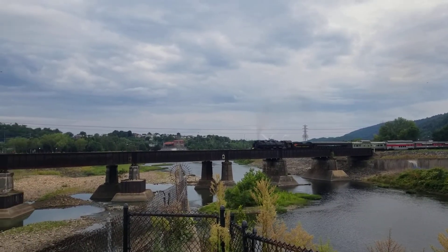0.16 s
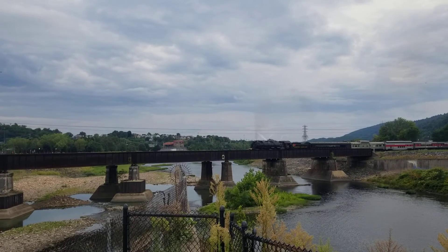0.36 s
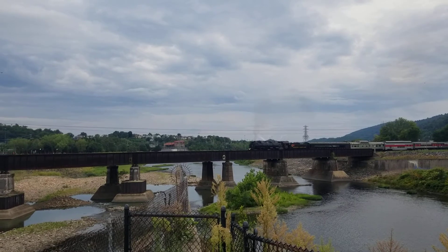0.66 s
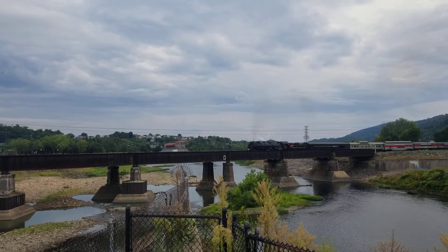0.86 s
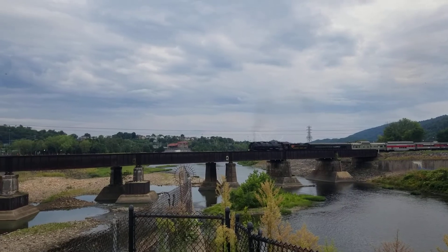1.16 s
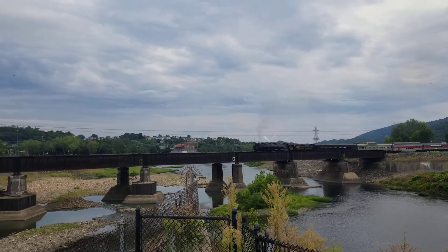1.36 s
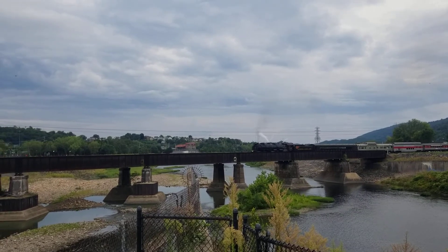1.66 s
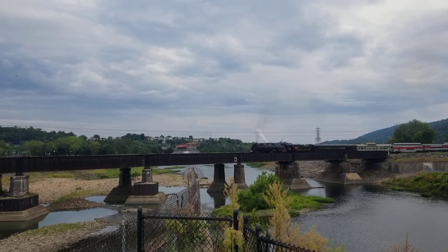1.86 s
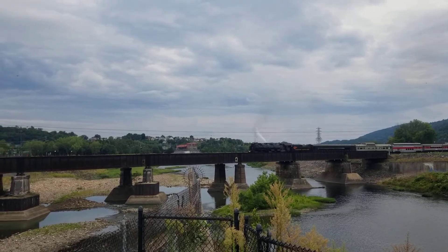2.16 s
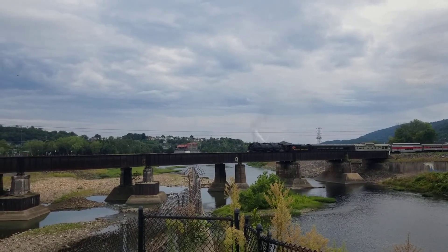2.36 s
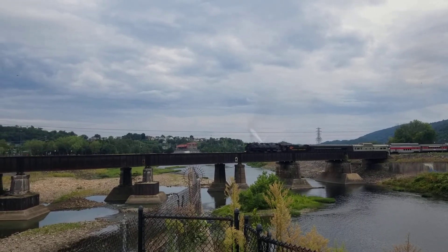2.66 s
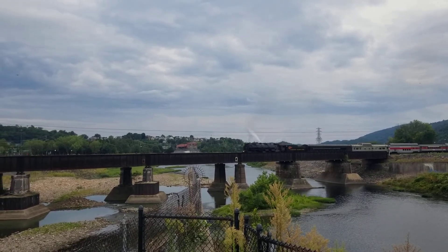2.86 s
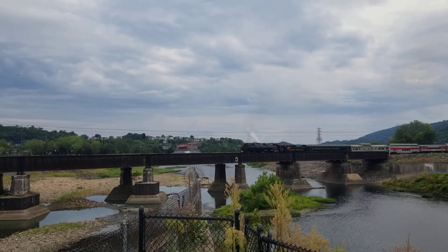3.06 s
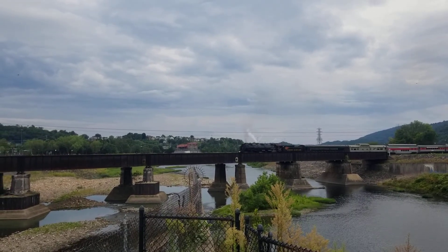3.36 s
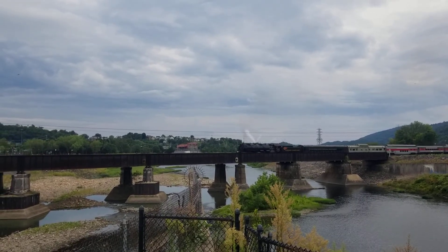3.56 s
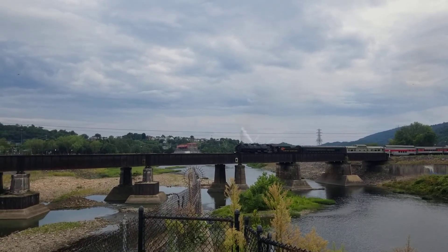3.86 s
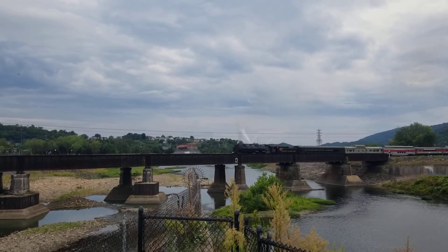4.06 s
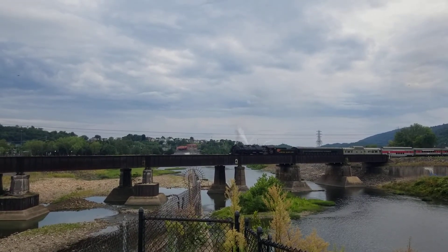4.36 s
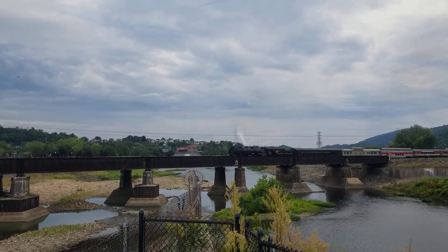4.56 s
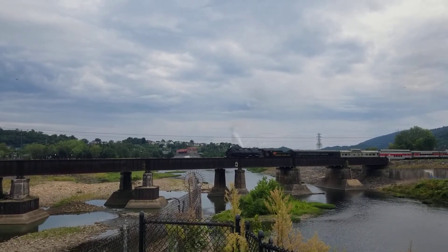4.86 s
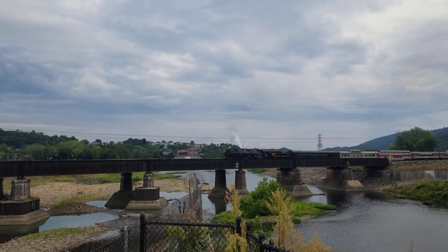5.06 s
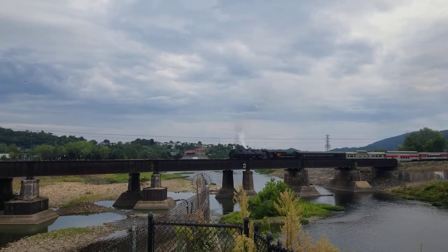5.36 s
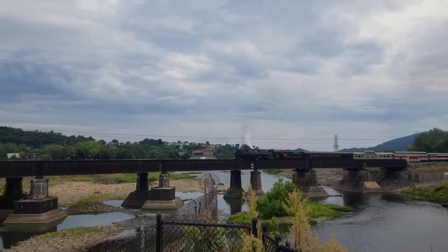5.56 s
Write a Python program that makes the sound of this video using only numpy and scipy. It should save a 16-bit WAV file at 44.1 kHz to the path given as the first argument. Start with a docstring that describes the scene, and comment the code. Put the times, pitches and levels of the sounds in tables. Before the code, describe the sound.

The driver eases the steam whistle from its full mid-low pitch to a duller, lower moan, jerks out a short sharp toot, almost shuts it, then opens fully for over four seconds. The tone is rich, buzzy and breathy with steam, gently shimmering. Bank and pier echoes and long open-air reverberation surround it, with soft train rumble beneath, heard from a distant stereo microphone.

```python
"""Over a river bridge in a valley, a distant locomotive creeps away blowing a single-chime steam whistle.
The valve eases off, jerks open, shuts, then opens fully; steam pressure sets pitch and overtones alike.
The whistle is a harmonic series with pulsed hiss. The bank returns a late, slightly flatter echo that beats
with the direct tone, and the far piers a later one. The valley tail is the whistle convolved with sparse
decaying reflections; the train's rumble is coloured noise."""
import sys
import numpy as np
from scipy import signal
from scipy.fft import rfft, irfft, next_fast_len
from scipy.io import wavfile
from scipy.ndimage import uniform_filter1d

SR = 44100
rng = np.random.default_rng(int(sys.argv[2]) if len(sys.argv) > 2 else 0)


def unload_audio(sound):
    """Save the sound as a 16-bit wav file, at the path given as the first command line argument."""
    columns = np.transpose(np.atleast_2d(sound))
    # keep every value between -1 and 1, then stretch to whole-number steps
    steps = np.round(np.clip(columns, -1, 1) * 32767)
    wavfile.write(sys.argv[1], SR, steps.astype(np.int16))


N = 252252
LEAD = 2 * SR  # samples of whistle computed ahead of the start, to feed echoes and tail

# the driver's hand on the valve, as the pitch the steam pressure heads for: (time [s], pitch [Hz])
VALVE_PITCH = [(-2, 350), (-.2, 349), (-.1, 344), (-.02, 336), (.18, 326.2), (.7, 324.7), (.95, 323.1),
               (1.12, 320), (1.19, 319.8), (1.225, 347.2), (1.379, 347.2), (1.408, 310), (1.605, 306.2),
               (1.612, 348), (2.1, 349), (2.8, 349.7), (3.3, 349.3), (3.65, 350.1), (5.35, 350.6),
               (5.72, 348.6)]
PRESSURE_LAG_S = .018
SHUT_HZ, OPEN_HZ = 309, 350  # pitches at which the pressure scale reads 0 and 1

# overtone level falls with the logarithm of the pressure above the share SPEAK
OPEN_DB, DB_PER_DECADE, SPEAK, LEAK = -24.5, 8, .1, 0.0014
# a valve jerked open overblows for a moment; one slammed shut chokes the overtones while the pitch falls
SURGE_DB, CHOKE_DB = 7.5, 11  # per full pressure change within one PRESSURE_LAG_S
TREBLE_SHUT_DB, TREBLE_RISE_DB = -44, 18  # the treble grows evenly with pressure
# slow swelling and dulling of the treble: (time [s], relative level [dB])
TREBLE_SWELL = [(0, 0.1), (1.15, 2.6), (1.3, 2.5), (1.7, -1), (2.05, -0.5), (2.6, 2), (3.2, 1.7), (3.5, 4),
                (4.4, 2.5), (4.92, -2.5), (5.3, 0.8), (5.72, 2)]
TOP_HZ, TOP_SWING, TOP_EVEN_DB = 9800, .8, 1.5  # above TOP_HZ the treble swells and dulls further

# fundamental, swelled and thinned by near reflections as the train rolls: (time [s], level [dB])
FUNDAMENTAL_LEVEL = [(0, -28), (.05, -21.5), (.1, -15.5), (.19, -16.5), (.21, -29), (.24, -14), (.3, -36),
                     (.33, -18.5), (.42, -14), (.55, -29), (.66, -23.5), (.85, -26), (1.04, -14.5),
                     (1.14, -26.5), (1.24, -17.5), (1.36, -21), (1.44, -21), (1.53, -27), (1.6, -21.5),
                     (1.85, -16.5), (2, -29), (2.2, -17), (3.2, -17.5), (3.6, -26.5), (4.05, -19),
                     (4.2, -18.5), (4.45, -15), (4.75, -22), (5.1, -15.5), (5.55, -16.5), (5.72, -31)]
# overtones at low pressure: (multiple [1], relative level [dB])
SOFT_OVERTONES = [(1, 0), (2, -17), (3, -4), (4, -11), (5, -25), (6, -13), (7, -13), (8, -14), (9, -18),
                  (10, -18), (11, -20), (12, -28), (13, -29), (14, -26)]
# overtones at full pressure: (multiple [1], relative level [dB])
FULL_OVERTONES = [(1, 1.5), (2, -11.5), (3, -1.5), (4, -18), (5, -14), (6, -5), (7, -14), (8, -16.5),
                  (9, -14), (10, -19.5), (11, -22.5), (12, -18.5), (13, -21), (14, -20)]
# overtones above those: (frequency [Hz], relative level [dB])
TREBLE_OVERTONES = [(5000, -21), (6000, -29), (7000, -29), (7900, -20.5), (9000, -34.5), (10000, -24),
                    (11500, -22), (12600, -23), (14000, -43), (15500, -45)]
# near reflections sway the low overtones, each at its own pace:
# (multiple [1], depth [dB], period [s], time of the cosine's crest [s], drift [dB/s])
OVERTONE_SWAY = [(2, 2.5, 2.72, 2.35, -2), (3, 1.5, 3.13, 2.04, 0.4), (4, 8.5, 5.1, 5.6, -0.9),
                 (5, 2, 4, 1.85, -1), (6, 0.9, 2.9, 3.1, -0.6), (7, 5.5, 3.66, 5.2, 0.85),
                 (8, 4.7, 3.96, 2.2, 0.2), (9, 2.5, 2.9, 4.23, -1.4), (10, 3.5, 2.6, 4.6, .1),
                 (12, 1.5, 3.6, 4.3, -0.9)]
SWAY_MIDDLE_S = 3.7  # the drift passes zero here
SOFT_FLUTTER = 0.45  # overtones waver more at low pressure, by this share
# each pulse returns off the boiler and the water: (delay [cycles], gain [1])
PULSE_REPEATS = [(0, 1), (.15, .3), (.65, .6)]

# steam hiss between the overtones: (frequency [Hz], relative density [dB per Hz])
HISS_COLOUR = [(60, -37), (200, -16), (420, -15), (800, 0), (1200, 1), (1600, -7.5), (2200, 0.5),
               (3200, 0.5), (3900, -5.5), (5500, -7.5), (8000, -8.5), (9300, -8.5), (11500, -6),
               (13200, -11), (14500, -26), (15600, -37)]
HISS_SAME = [(300, 0.88), (1500, 0.92), (10000, 0.69)]  # (frequency [Hz], left-right likeness [1])

# microphone pair facing the bridge:
# (frequency [Hz], left minus right level [dB], phase left leads beyond its lag [rad])
MICROPHONE_PAIR = [(98, 1, 0.064), (336, 3.5, 0.08), (700, 2.5, -0.078), (990, 1, -0.77),
                   (1380, 1.5, -0.82), (1570, -1, 1.76), (2130, -1, 0.049), (3180, -1.5, -0.14),
                   (4600, 2.5, 0.22), (6160, -2, -0.32), (8450, 1.5, 0.83), (9400, -1.5, -0.23),
                   (14000, 3.5, 0.42)]
LEFT_LAG_S = 3.2e-5

# bank echo, fundamental: (time [s], level before the order and side gains [dB])
BANK_FUNDAMENTAL = [(0, -26), (.3, -53), (.6, -56), (1.7, -44), (1.9, -31), (2.25, -22), (2.9, -28),
                    (3.75, -26.5), (4.25, -33.5), (4.6, -30), (5.1, -43), (5.72, -35)]
# bank echo, harmonics: (multiple [1], level above its fundamental or overtone level [dB], left lead [rad])
BANK_HARMONICS = [(1, 2.5, -0.5), (2, -22, 0.5), (3, -8.5, 4), (4, -23, 3), (5, -27.5, -1.5), (6, -18.5, 2)]
BANK_MS, BANK_MS_PER_S = 177.8, 13.22  # delay at the start and its growth
# pier echo, fundamental: (time [s], level before the order and side gains [dB])
PIER_FUNDAMENTAL = [(0, -29), (.22, -34), (.3, -43), (1.4, -38), (1.46, -21.5), (1.63, -21.5), (1.7, -29),
                    (1.86, -33), (2, -44), (5.72, -57)]
# pier echo, harmonics: (multiple [1], level above its fundamental or overtone level [dB], left lead [rad])
PIER_HARMONICS = [(1, 1, 0.3), (2, -25.5, 0.73), (3, -20, 0.78), (4, -41, 1.5), (5, -19.5, 2.4),
                  (6, -25.5, 0.63)]
PIER_MS, PIER_MS_PER_S = 232, 1.5  # path nearly constant

# what the valley keeps of the whistle: (multiple [1], level relative to the overtone level [dB])
VALLEY_HARMONICS = [(1, -12), (2, -20), (3, -17), (4, -28), (5, -25), (6, -21), (7, -28), (8, -30),
                    (9, -30)]
# reverberation of the valley: (frequency [Hz], time to fall by 60 dB [s])
VALLEY_DECAY = [(200, 11), (500, 2.6), (1500, 3.9), (5000, 1.44)]

# train rumble: (frequency [Hz], relative density [dB per Hz])
RUMBLE_COLOUR = [(15, -48), (27, -18), (45, -1.5), (65, 4), (110, -4.5), (200, -13), (260, 0.5),
                 (400, -1.5), (1000, -9), (3000, -12.5), (8000, -28.5), (12000, -24.5), (15000, -50)]
# train rumble: (frequency [Hz], left-right likeness [1])
RUMBLE_LIKENESS = [(60, 0.99), (150, 0.99), (250, .95), (600, 0.33), (1500, 0.12), (15000, 0)]
EDGE_HZ = 15700  # band limit of the output


def gain_of(db):
    """Logarithmic level: decibels to amplitude gain."""
    return np.exp(np.asarray(db) * (np.log(10) / 20))


def evened(x):
    """Normalization of power: scales to rms 1."""
    return x / np.sqrt(np.mean(x ** 2) + 1e-20)


def curve(rows, t):
    """Linear interpolation in time: the columns of a time table at times t."""
    s, *columns = np.transpose(rows)
    return [np.interp(t, s, c) for c in columns]


def read(points, hz, axis=1):
    """Interpolation on a logarithmic frequency axis: a column of a spectrum table at hz."""
    table = np.transpose(points)
    return np.interp(np.log(hz + 1), np.log(table[0] + 1), table[axis])


def wander(rate_hz, count):
    """Low-pass filtered random process: slow curves of rms 1."""
    steps = uniform_filter1d(rng.standard_normal((count, N // 64 + 2)), 5)
    pole = np.exp(-2 * np.pi * rate_hz * 64 / SR)
    smooth = evened(signal.lfilter([1], [1, -pole], steps))
    return [np.interp(np.arange(N) / 64, np.arange(len(row)), row) for row in smooth]


def noise(colour, likeness, patchy_db):
    """Spectral shaping of partly coherent noise: two channels with drifting patches."""
    frames, hz = N // 256 + 5, np.fft.rfftfreq(1024, 1 / SR)
    a, b, c, d, patches = rng.standard_normal((frames, 513, 5)).T
    patches = evened(uniform_filter1d(uniform_filter1d(patches, 10, 0), 12, 1))
    same = np.clip(read(likeness, hz), 0, 1)[:, None]
    left = a + 1j * b
    right = same * left + np.sqrt(1 - same ** 2) * (c + 1j * d)
    spectra = np.array([left, right]) * gain_of(read(colour, hz)[:, None] + patchy_db * patches)
    return evened(signal.istft(spectra, nperseg=1024, noverlap=768)[1][:, :N])


def highpass(x, hz):
    """Second-order Butterworth filtering: passes what lies above hz."""
    return signal.sosfilt(signal.butter(2, hz, "high", fs=SR, output="sos"), x)


def pitch(t):
    """First-order relaxation: pressure, and pitch with it, follows the valve with a short lag."""
    coarse = np.arange(-LEAD, N + 32, 32) / SR
    keep = np.exp(-32 / (PRESSURE_LAG_S * SR))
    aim = curve(VALVE_PITCH, coarse)[0]
    lagged = aim[0] + signal.lfilter([1 - keep], [1, -keep], aim - aim[0])
    return np.interp(t, coarse, lagged)


def cycles(t):
    """Phase as the integral of frequency: cycles run through by emission time t."""
    fine = np.arange(-LEAD, N) / SR
    return np.interp(t, fine, np.cumsum(pitch(fine)) / SR)


def blow(t):
    """Pressure-driven excitation: overtone level, and treble above it, from the steam pressure."""
    steam = np.clip((pitch(t) - SHUT_HZ) / (OPEN_HZ - SHUT_HZ), 0, 1)
    change = np.gradient(steam, 1 / SR) * PRESSURE_LAG_S
    excess = np.maximum(steam - SPEAK, 0) / (1 - SPEAK)
    level_db = OPEN_DB + DB_PER_DECADE * np.log10(excess + LEAK)
    level_db = level_db + np.where(change > 0, SURGE_DB, CHOKE_DB) * change
    level_db = uniform_filter1d(level_db, size=SR // 50)
    treble_db = TREBLE_SHUT_DB + TREBLE_RISE_DB * steam + curve(TREBLE_SWELL, t)[0]
    return level_db, treble_db - level_db


def overtones(t, shaky, pressure, top_db):
    """Fourier synthesis of a pulse train: harmonics 2 to 44 with levels set by pressure."""
    hz, (level_db, treble_db) = pitch(t), blow(t)
    shut = np.clip((318 - hz) / 6, 0, 1)  # barely blown, the tone keeps only its lowest overtones
    flutter = 1 + SOFT_FLUTTER * (1 - pressure)
    fades = wander(rate_hz=7.0, count=44)  # moving air lets each overtone fade on its own
    drifts = wander(rate_hz=5.3, count=44)  # and arrive from a slightly other side
    sway = {}
    for k, depth_db, period, top, drift in OVERTONE_SWAY:
        swing = depth_db * np.cos(2 * np.pi * (t - top) / period)
        sway[round(k)] = swing + drift * (t - SWAY_MIDDLE_S)
    tone = np.zeros((2, N))
    for k in range(2, 45):
        if k <= len(FULL_OVERTONES):
            soft_db = SOFT_OVERTONES[k - 1][1] + 8 + shut * max(11.0 - 1.9 * k, 0)
            full_db = FULL_OVERTONES[k - 1][1] + 5
            db = (1 - pressure) * soft_db + pressure * full_db + 0.035 * k * (treble_db - 2.5)
        else:
            db = np.repeat(read(TREBLE_OVERTONES, k * hz[::64]), 64)[:N]
            db = db + treble_db + 8.0 + top_db * (k * OPEN_HZ > TOP_HZ)
        depth = np.clip(-(db.mean() - 3.5) / 16, 0, 1) * min(k / 4, 1)  # weak, high ones waver most
        db = level_db + db + pressure * sway.get(k, 0) + 1.92 * flutter * depth * fades[k - 1]
        repeats = np.angle(sum(g * np.exp(-2j * np.pi * k * at) for at, g in PULSE_REPEATS))
        late = repeats + 0.35 * depth * fades[-k]
        side = 0.3 * depth * drifts[k - 1] * np.array([[1], [-1]])
        tone += np.sqrt(2) * gain_of(db) * np.cos(2 * np.pi * k * shaky - .4 + late + side)
    return tone


def steam_hiss(t, shaky, pressure, top_db):
    """Amplitude modulation of turbulence noise: a puff of hiss rides on every pulse and its repeats."""
    level_db, treble_db = blow(t)
    puff = .65 + sum(g * np.exp(-((shaky - at) % 1) / .08) for at, g in PULSE_REPEATS)
    hiss = evened(puff * noise(HISS_COLOUR, HISS_SAME, patchy_db=1.0))
    hiss = hiss + (gain_of(top_db) - 1) * highpass(hiss, TOP_HZ)
    hiss = hiss + (gain_of(treble_db + 5.5) - 1) * highpass(hiss, 4500)
    return gain_of(level_db - 2.5 + 0.78 * pressure) * hiss


def whistle(t):
    """Periodic excitation: fundamental, overtones and pulsed hiss share one running phase."""
    pressure = np.clip((pitch(t) - 331) / 14, 0, 1)
    top_db = TOP_SWING * (curve(TREBLE_SWELL, t)[0] - TOP_EVEN_DB)
    turns = cycles(t)
    shaky = turns + 0.0069 * wander(rate_hz=21, count=1)[0]  # pulses come a little early or late
    level = np.sqrt(2) * gain_of(curve(FUNDAMENTAL_LEVEL, t)[0])
    fundamental = level * np.cos(2 * np.pi * turns - 1.0)
    tone = fundamental + overtones(t, shaky, pressure, top_db)
    return tone + steam_hiss(t, shaky, pressure, top_db)


def microphone_pair(x):
    """Interchannel difference: a small lag and a colour difference between left and right."""
    size = next_fast_len(N + 256)
    hz = np.fft.rfftfreq(size, 1 / SR)
    lead = read(MICROPHONE_PAIR, hz, axis=2) - 2 * np.pi * hz * LEFT_LAG_S
    half = gain_of(read(MICROPHONE_PAIR, hz) / 2) * np.exp(.5j * lead)  # each side takes half
    return irfft(rfft(x, size) * np.array([half, 1 / half]), size)[:, :N]


def echo(t, delay_ms, level_db, harmonics):
    """Doppler shift by a growing path: a dull copy sent earlier returns flatter, from another side."""
    then = t - delay_ms / 1000
    sent_db = blow(then)[0]  # overtones thin out when the valve was nearly shut
    fades = wander(rate_hz=4.1, count=len(harmonics))
    turns, sides = cycles(then), np.array([[.5], [-.5]])
    total = np.zeros((2, N))
    for (k, db, lead), fade in zip(harmonics, fades):
        heard_db = db + (level_db if k == 1 else sent_db + 2.0 * fade)
        total += np.sqrt(2) * gain_of(heard_db) * np.cos(2 * np.pi * k * turns - 1.0 + lead * sides)
    return total


def bank_echo(t):
    """Reflection off the bank behind a receding source: the delay lengthens steadily."""
    level_db = curve(BANK_FUNDAMENTAL, t)[0]
    sound = echo(t, BANK_MS + BANK_MS_PER_S * t, level_db, BANK_HARMONICS)
    return sound * gain_of([[1.8], [-1.2]])


def pier_echo(t):
    """Reflection off the far piers: a later echo over a nearly constant path."""
    level_db = curve(PIER_FUNDAMENTAL, t)[0]
    sound = echo(t, PIER_MS + PIER_MS_PER_S * t, level_db, PIER_HARMONICS)
    return sound * gain_of([[1.2], [-.8]])


def valley():
    """Reverberation by convolution: low whistle harmonics in a long tail of sparse reflections."""
    then = np.arange(-LEAD, N) / SR
    level = gain_of(blow(then)[0] - 0.5)
    turns = .994 * cycles(then)  # the tail sounds 0.6 % flat
    fed = level * sum(gain_of(db) * np.cos(2 * np.pi * k * turns) for k, db in VALLEY_HARMONICS)
    taps = np.zeros((2, LEAD))
    # one reflection of random sign at a random place in every 40 samples
    at = np.arange(2000, LEAD - 40, 40) + rng.integers(0, 40, (2, (LEAD - 2001) // 40))
    np.put_along_axis(taps, at, rng.choice([-1., 1.], at.shape), 1)
    taps[1] = 1.1 * taps[0] + 0.73 * taps[1]  # the right side partly shares the left's reflections
    hz, s, spectra = signal.stft(taps, SR, nperseg=256)
    decay = gain_of(-60 * s / read(VALLEY_DECAY, hz)[:, None])
    tail = signal.istft(spectra * decay, SR, nperseg=256)[1]
    tail = tail / np.linalg.norm(tail[0])
    return signal.fftconvolve(fed[None], tail, axes=1)[:, LEAD:LEAD + N]


def train_rumble():
    """Broadband random excitation: coloured noise, nearly identical left and right in the bass."""
    return gain_of(-33.5) * noise(RUMBLE_COLOUR, RUMBLE_LIKENESS, patchy_db=2.0)


def scene():
    """Superposition: whistle, two echoes, valley tail and train rumble."""
    t = np.arange(N) / SR
    direct = microphone_pair(whistle(t))
    return direct + bank_echo(t) + pier_echo(t) + valley() + train_rumble()


def record(dry):
    """Saturation and band limiting: the input stage rounds off the highest peaks, then a low-pass."""
    rounded = dry / (1 + abs(dry / .9) ** 6) ** (1 / 6)
    lowpass = signal.firwin(511, EDGE_HZ, window=("kaiser", 9), fs=SR)
    return signal.oaconvolve(rounded, lowpass[None], "same")


dry = scene()
out = record(dry)
unload_audio(out)
```